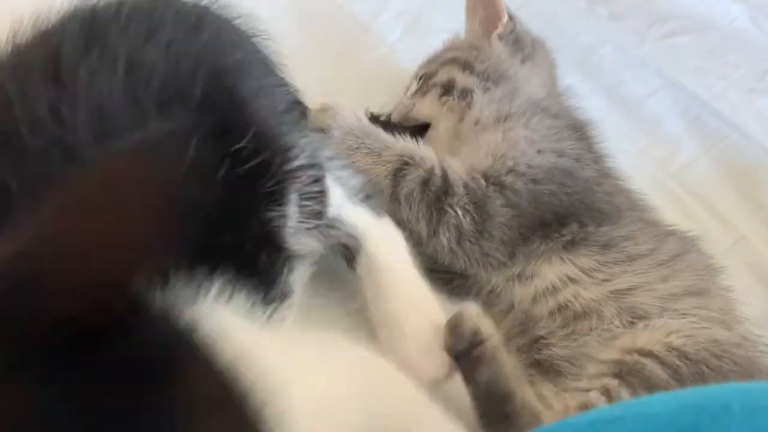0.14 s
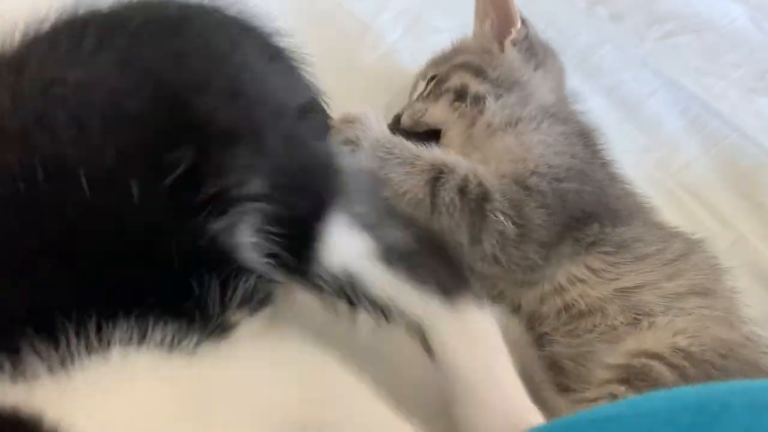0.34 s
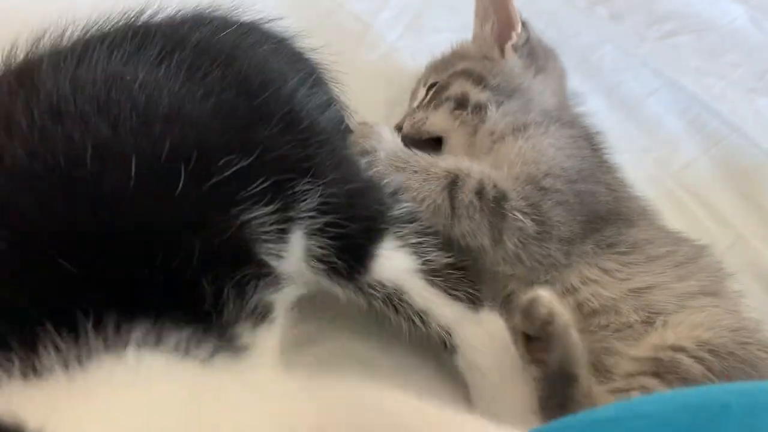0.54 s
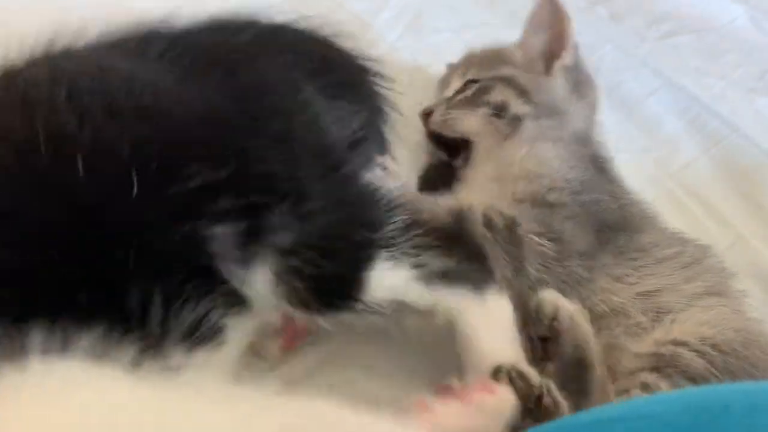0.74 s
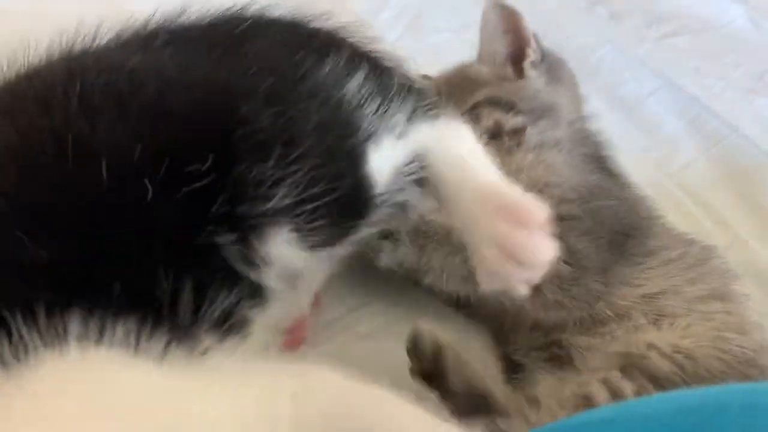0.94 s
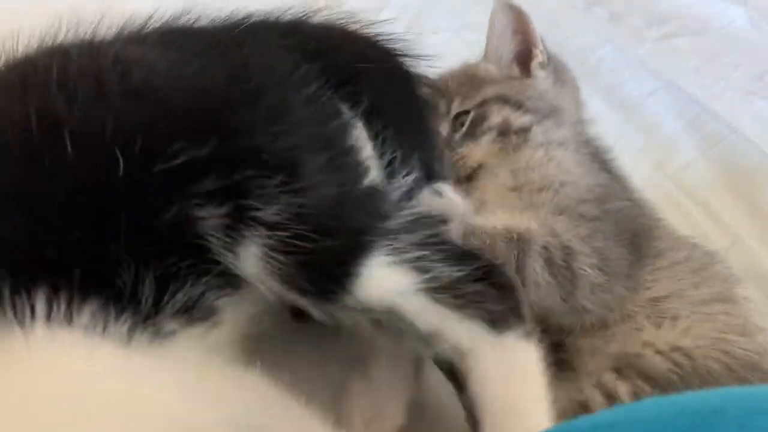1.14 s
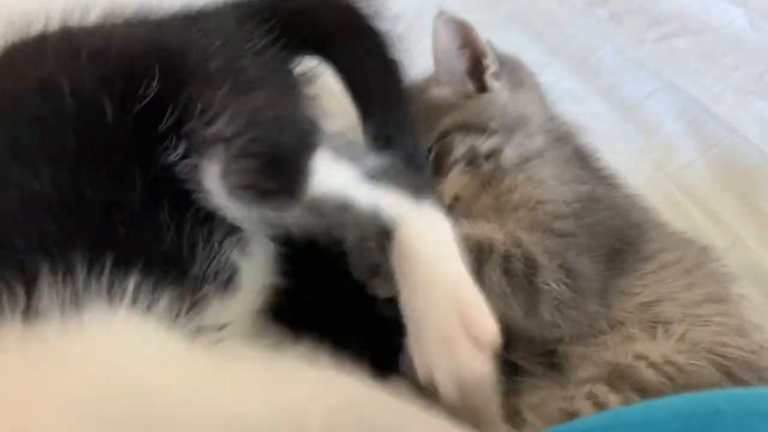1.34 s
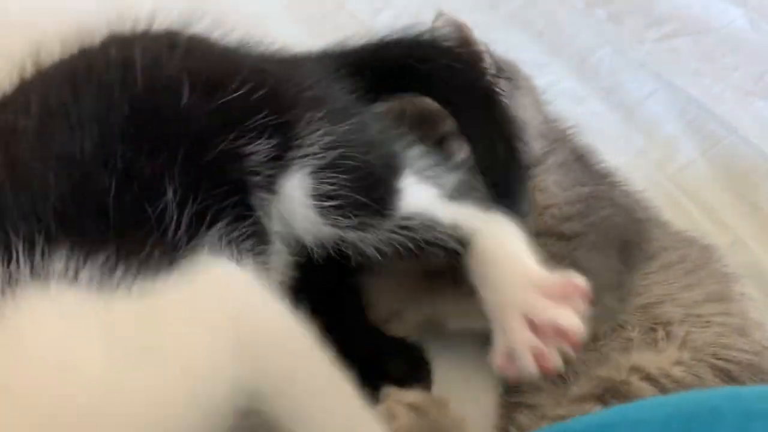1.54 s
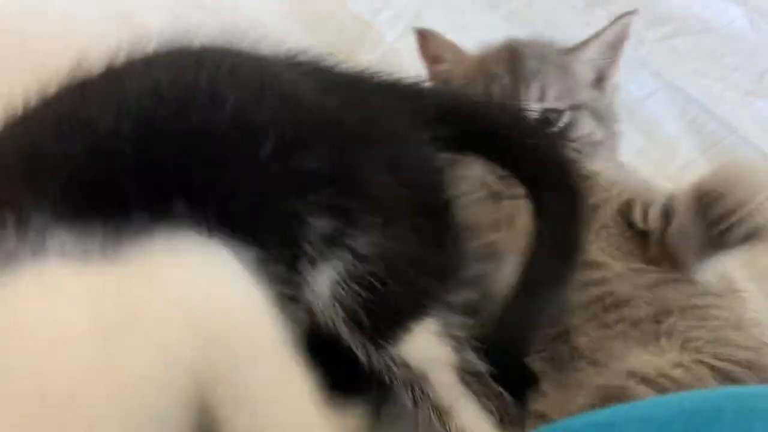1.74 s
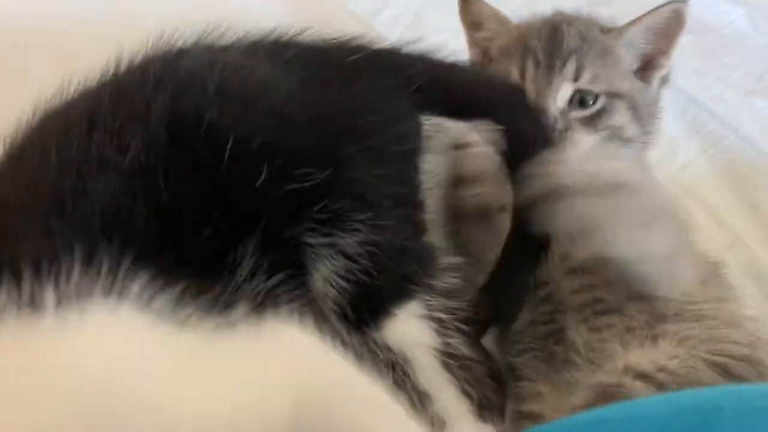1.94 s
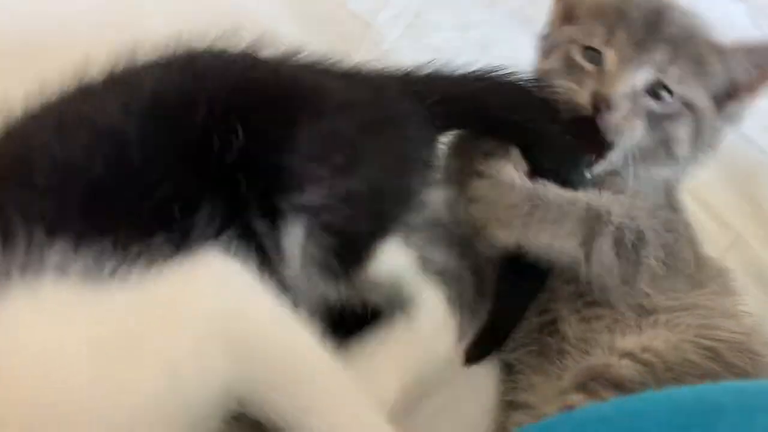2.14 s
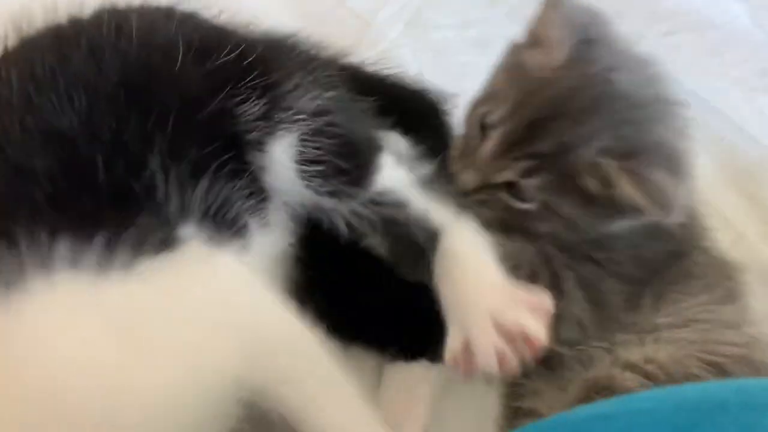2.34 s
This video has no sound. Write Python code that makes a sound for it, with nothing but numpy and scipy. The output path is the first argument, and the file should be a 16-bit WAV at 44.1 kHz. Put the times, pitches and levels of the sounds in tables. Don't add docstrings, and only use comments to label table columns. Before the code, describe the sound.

Two kittens tussle close by on bedding, softly thudding and rubbing, growing rougher towards the end

```python
import sys
import numpy as np
from scipy import signal
from scipy.fft import rfft, irfft
from scipy.io import wavfile
from scipy.ndimage import uniform_filter1d

SR = 44100
rng = np.random.default_rng(int(sys.argv[2]) if len(sys.argv) > 2 else 0)


def gain_from_decibels(decibels):
    exponent = np.asarray(decibels, float) / 20
    return 10 ** exponent


def log_audio(samples):
    frames = np.atleast_2d(samples).T
    limited = np.clip(frames, -1, 1)
    pcm = np.round(limited * 32767).astype(np.int16)
    wavfile.write(sys.argv[1], SR, pcm)


N = 109764

# (time [s], level [dB])
SWAY = [
    (0, -54),
    (.6, -54.5),
    (.95, -52),
    (1.2, -46.5),
    (1.548, -49.5),
    (1.9, -44.5),
    (2.12, -46),
    (2.3, -42.5),
    (2.49, -35),
]
# (start [s], length [s], drag level [dB], hiss level [dB], weight [dB])
STROKES = [(-.04, 0.14, -62.5, -75.5, -0.5), (0.188, 0.099, -69, -67, 1), (0.235, 0.16, -71.5, -87, -1),
           (0.416, 0.029, -59, -67.5, 5), (0.494, 0.46, -68, -105, 6), (0.667, 0.069, -54, -66.5, 4.5),
           (0.851, 0.063, -55, -66.5, -1), (1.019, 0.1, -58, -63.5, 0.5), (1.094, 0.081, -51, -59.5, -0.5),
           (1.127, 0.16, -52, -65.5, -0.5), (1.288, 0.11, -48.5, -58.5, 2.5),
           (1.379, 0.11, -56, -67.5, 3.5), (1.432, 0.18, -62.5, -71, -1.5), (1.587, 0.12, -59, -68, -0.5),
           (1.771, 0.18, -51.5, -58, 1.5), (1.86, 0.13, -48.5, -90, -0.5), (1.955, 0.056, -45.5, -61, 4.5),
           (1.972, 0.2, -58, -65.5, 2.5), (2.101, 0.23, -47, -58, 5.5), (2.213, 0.07, -41, -60, 3.5),
           (2.286, 0.047, -49.5, -61.5, 8), (2.335, 0.024, -39.5, -50.5, 6.5), (2.34, 0.079, -49, -57.5, 6),
           (2.377, 0.13, -58.5, -97, 5)]
# (time [s], peak level [dB], pitch [Hz])
KNOCKS = [(.07, -51.5, 537), (.425, -38.5, 604), (0.692, -38, 434), (0.697, -40, 860), (0.699, -38.5, 233),
          (0.866, -34.5, 278), (0.870, -33.5, 610), (1.06, -38, 694), (1.129, -40, 530), (1.131, -33, 247),
          (1.309, -27.5, 530), (1.328, -29.5, 610), (1.329, -32, 269), (1.345, -32, 198),
          (1.363, -32.5, 654), (1.412, -41.5, 1530), (1.425, -43, 930), (1.496, -45.5, 338),
          (1.717, -46.5, 392), (1.86, -33.5, 304), (1.923, -32, 450), (1.970, -21.5, 577),
          (1.986, -29, 564), (2.341, -27, 610), (2.345, -25, 480), (2.372, -29.5, 525)]
# (time [s], peak level [dB], pitch [Hz], length [cycles])
HEAVES = [(.073, -41.5, 90, 0.68), (.176, -33, 42.5, 2), (.221, -37.5, 47.4, 2.5), (.430, -31, 119, 3.85),
          (.443, -31, 39, 2.4), (.656, -41, 69.5, 1.1), (.703, -38, 147, 2.5), (.706, -39.5, 48, 3.1),
          (.872, -20.5, 74.5, 1.3), (.894, -24, 40.4, 1.2), (1.058, -31.5, 54.7, 2.7),
          (1.074, -30.5, 128, 2.14), (1.082, -30, 54, 1.6), (1.130, -28.5, 90.5, 1.37),
          (1.146, -37, 50, 1.2), (1.179, -37, 62.6, 1.7), (1.237, -38.5, 48, 2.3), (1.312, -36, 60, 0.96),
          (1.331, -28.5, 92, 1.6), (1.343, -35.5, 76, 1.4), (1.362, -26.5, 46, 2.97),
          (1.492, -39, 108, 1.7), (1.655, -34, 41.3, 0.75), (1.703, -29.5, 69, 2.4), (1.77, -33, 51.6, 1.5),
          (1.803, -33, 50.4, 3.4), (1.861, -25.5, 71.6, 1.6), (1.894, -27.5, 63.6, 1),
          (1.934, -18, 71, 1.17), (1.987, -29.5, 164.4, 4.1), (2.034, -34, 142, 2.7), (2.068, -36, 53, 1.6),
          (2.082, -31, 90, 2.35), (2.358, -18, 66.3, 0.68), (2.380, -21, 67, 2.84), (2.413, -26, 39.4, 1.2),
          (2.445, -25, 50.3, 1.2)]
# (start [s], length [s], level [dB], first pitch [Hz], last pitch [Hz])
RUBS = [(0.181, 0.12, -62.5, 714.5, 1255), (0.26, 0.021, -57, 795, 760), (0.439, 0.034, -66, 610, 570),
        (.48, 0.072, -61.5, 226, 334), (0.671, 0.031, -60, 1355, 1154), (0.299, 0.046, -66, 648, 1020),
        (0.24, .13, -69, 3120, 3810), (1.11, 0.047, -47.5, 586.6, 503), (1.154, 0.075, -52, 827, 902),
        (1.168, 0.0213, -44.5, 408, 390), (1.194, 0.057, -48.5, 687, 567), (1.824, 0.1, -51, 707.6, 474),
        (2.141, 0.085, -52, 331, 370), (2.214, 0.043, -37.5, 365.5, 308), (2.24, 0.046, -41, 516, 396),
        (2.302, 0.027, -40.5, 564, 304), (2.333, 0.013, -50, 3260, 3140)]
# (time [s], peak level [dB], pitch [Hz])
TICKS = [(0.3063, -43, 6000), (0.3068, -36.5, 10500), (0.3047, -23, 13600), (0.405, -39, 6400),
         (0.4144, -48, 6240), (0.4687, -36, 7800), (0.4686, -56, 12500), (0.5397, -48, 8240),
         (0.826, -41, 13200), (1.0174, -41, 5130), (1.059, -36, 4800), (1.057, -46.5, 2300),
         (1.128, -46, 3640), (1.127, -40, 2100), (1.1967, -44, 3340), (1.361, -42, 3500),
         (1.4106, -49, 3600), (1.9262, -34, 3960), (1.9813, -43, 3120), (1.984, -47, 5500),
         (2.1165, -46, 7000), (2.3418, -52, 3470), (2.3446, -25.5, 2930), (2.3475, -30.5, 6240)]

# (frequency [Hz], level [dB per Hz])
SWAY_COLOUR = [(15, 3), (30, 0), (70, -4.5), (150, -12), (260, -32), (500, -63)]
ROOM_COLOUR = [(88, -23), (150, -3), (396, -17), (722, -18), (2230, -24.5), (9180, -29.5), (11400, -29),
               (13500, -27.5), (15500, -29)]
DEEP_COLOUR = [(130, -31), (210, 1), (330, 0), (470, -7), (700, -55.5)]
DRAG_COLOUR = [(250, -34), (450, 0), (700, 2), (1000, -6), (1400, -11.5), (1750, -20.5), (2300, -56)]
HISS_COLOUR = [(1300, -35), (2000, 0.5), (2700, -2.5), (3400, -0.5), (4300, -5.5), (5500, -4), (7500, -9),
               (10000, -44)]
AIR_COLOUR = [(4500, -9), (7000, -13.5), (8500, -4), (10500, -4), (13500, -15), (15500, -15)]

# (frequency [Hz], level [dB])
PORT_DB = [(400, -0.04), (750, 5), (1300, 4.5), (1900, 2), (3200, 9.5), (4000, 4.5), (5300, 6.5), (6700, 1)]
# (frequency [Hz], phase [rad])
PORT_LEAD = [(0, -.3), (90, -.3), (170, .1), (1550, -.1), (1950, -2.4), (2900, -3.5), (6700, -9.9),
             (15500, -21.8)]
# (frequency [Hz], power share [0-1])
OWN_SHARE = [(30, 0.058), (300, 0.025), (1200, 0.23), (2300, 0.76), (3500, 0.56), (5800, 1), (7500, 0.48),
             (15000, 0.29)]


def rms_one(x):
    return x / np.sqrt(np.mean(x ** 2) + 1e-20)


def at_hz(points, hz):
    points = np.array(points)
    return np.interp(np.log(hz + 1), np.log(points[:, 0] + 1), points[:, 1])


def drift(rate_hz):
    r = np.exp(-2 * np.pi * rate_hz / SR)
    wander = signal.lfilter([1], [1, -2 * r, r * r], rng.standard_normal(N + SR))
    return rms_one(wander[SR:])


def grainy(colour, grains_per_s, spread_db, smooth):
    slip_here = rng.random(N) < grains_per_s / SR
    sizes = gain_from_decibels(spread_db * np.minimum(rng.exponential(1, N), 4)) * slip_here
    slips = np.abs(uniform_filter1d(sizes, size=60)) ** 0.5
    white = rng.standard_normal((3, N)) * (smooth + rms_one(slips))
    hz = np.fft.rfftfreq(N, 1 / SR)
    return rms_one(irfft(rfft(white) * gain_from_decibels(at_hz(colour, hz)) * (hz > 15), N))


def wavelets(rows, fall, rise):
    out = np.zeros(N + SR)
    for s, db, hz, cycles in rows:
        u = np.arange(int(1.6 * cycles / hz * SR)) / SR * hz / cycles
        sag = fall * 0.35 * (1 - np.exp(-u / 0.11)) - fall * 0.25 * u
        swing = np.sin(2 * np.pi * cycles * (u + sag))
        shape = (1 - np.exp(-u / rise)) * np.exp(-(u / 0.77) ** 2)
        i = int(s * SR)
        out[i:i + len(u)] -= gain_from_decibels(db) * 1.074 * shape * swing
    return out[:N]


def filtered(x, response):
    edge = 2048
    wide = np.pad(x + np.zeros((2, N)), [(0, 0), (edge, edge)], mode="reflect")
    size = N + 2 * edge
    return irfft(rfft(wide) * response(np.fft.rfftfreq(size, 1 / SR)), size)[:, edge:-edge]


def room_hiss():
    return grainy(ROOM_COLOUR, 1600, 3.1, smooth=3.4) * gain_from_decibels(-64.5 + 1.7 * drift(6.3))


def spring_sway():
    s, db = np.transpose(SWAY)
    level_db = np.interp(np.arange(N) / SR, s, db) + 2.0 * drift(12.0)
    return grainy(SWAY_COLOUR, 46, 0.82, smooth=18) * gain_from_decibels(level_db)


def fur():
    rise_share, deep_db, air_db, air_loss = 0.41, -3, -1, 1.27
    t, power = np.arange(N) / SR, np.zeros((4, N))
    for s, length, drag_db, hiss_db, weight_db in STROKES:
        swell = np.interp(t, [s, s + rise_share * length, s + 1.24 * length], [0, 1, 0])
        layers_db = [drag_db + deep_db + weight_db, drag_db,
                     hiss_db, hiss_db + air_db - air_loss * weight_db]
        power += np.sin(np.pi / 2 * swell) ** 3 * gain_from_decibels(layers_db)[:, None] ** 2
    layers = [grainy(DEEP_COLOUR, 300, 3.0, smooth=2.2),
              grainy(DRAG_COLOUR, 330, 5.0, smooth=2.4),
              grainy(HISS_COLOUR, 780, 3.7, smooth=1.4),
              grainy(AIR_COLOUR, 630, 3.4, smooth=1.25)]
    rubbing = sum(x * p ** 0.5 for x, p in zip(layers, power))
    return gain_from_decibels(0.21 * drift(41)) * rubbing


def paw_knocks():
    cycles, delay_s = 2.26, 0.001075
    return wavelets([(s + delay_s, db, hz, cycles) for s, db, hz in KNOCKS], fall=0.64, rise=0.08)


def mattress():
    return wavelets(HEAVES, fall=0.35, rise=0.14)


def folds():
    width_share, evening = 0.2, 0.68
    out = np.zeros((3, N))
    for s, length, db, from_hz, to_hz in RUBS:
        i, n = int(s * SR), int(length * SR)
        r = np.exp(-np.pi * width_share * (from_hz + to_hz) / 2 / SR)
        wobble = signal.lfilter([1], [1, -2 * r, r * r], rng.standard_normal((2, 3, 8000)))[..., -n:]
        wobble = wobble / np.hypot(*wobble) ** evening
        turn = 2 * np.pi * np.cumsum(np.geomspace(from_hz, to_hz, n)) / SR
        hum = rms_one(wobble[0] * np.sin(turn) + wobble[1] * np.cos(turn))
        out[:, i:i + n] += gain_from_decibels(db) * np.hanning(n) ** 0.5 * hum
    return out


def claws():
    t60_s, snap_db, pitch_spread, delay_s = 0.0024, -2, 0.17, 0.000927
    out, t = np.zeros(N + SR), np.arange(600) / SR
    for s, db, hz in TICKS:
        steps = rng.standard_normal((3, 1)) * 0.5 + [[-1], [0], [1]]
        rings = np.sin(2 * np.pi * t * hz * np.exp(pitch_spread * steps))
        fade = gain_from_decibels(-60 * t / t60_s) * (1 - np.exp(-t / 0.0001))
        tone = (rings * [[0.5], [1], [0.6]]).sum(axis=0) * fade
        snap = 3 * gain_from_decibels(snap_db) * np.sin(2 * np.pi * hz * t) * np.exp(-2.2 * hz * t)
        i = int((s + delay_s) * SR)
        out[i:i + 600] += gain_from_decibels(db - 4.5) * (tone + snap)
    return out[:N]


def ports(shared, own):
    def pair(hz):
        lead = np.interp(hz, *np.transpose(PORT_LEAD))
        half = gain_from_decibels(at_hz(PORT_DB, hz) / 2) * np.exp(0.5j * lead)
        return np.array([half, 1 / half])

    def share(hz):
        return np.clip(at_hz(OWN_SHARE, hz), 0, 1)

    common = filtered(shared, lambda hz: pair(hz) * np.sqrt(1 - share(hz)))
    separate = filtered(own, lambda hz: pair(hz) * np.sqrt(share(hz)))
    return common + separate


def scene():
    noisy = room_hiss() + spring_sway() + fur() + folds()
    struck = paw_knocks() + mattress() + claws()
    return ports(noisy[0] + struck, noisy[1:])


def band_limit(x):
    return signal.sosfilt(signal.butter(12, 16470, fs=SR, output="sos"), x)


def record(dry):
    notch_hz, notch_width_hz, notch_db, cutoff_hz = 11424, 374, -33, 15200

    def colour(hz):
        dip_db = notch_db * np.exp(-((hz - notch_hz) / notch_width_hz) ** 4)
        cut_db = -44 * np.clip((hz - cutoff_hz) / 1300, 0, 2)
        return gain_from_decibels(dip_db + cut_db)

    mix = filtered(dry, colour)
    return band_limit(mix)


dry = scene()
out = record(dry)
log_audio(out)
```